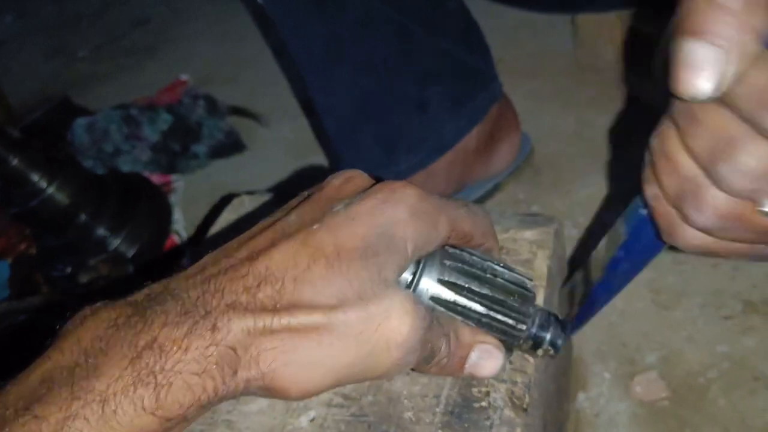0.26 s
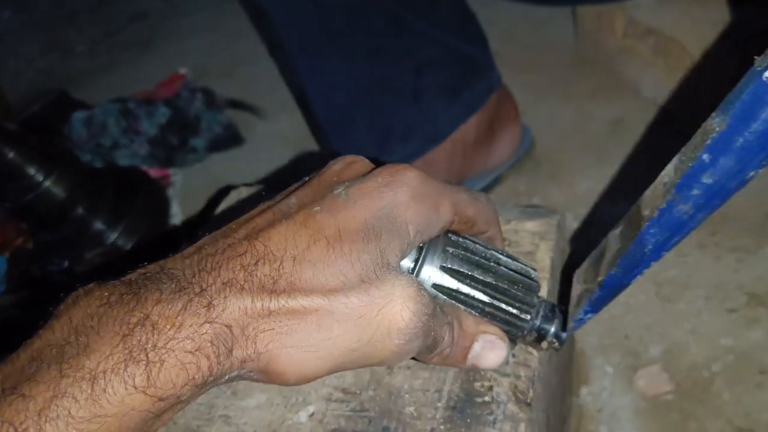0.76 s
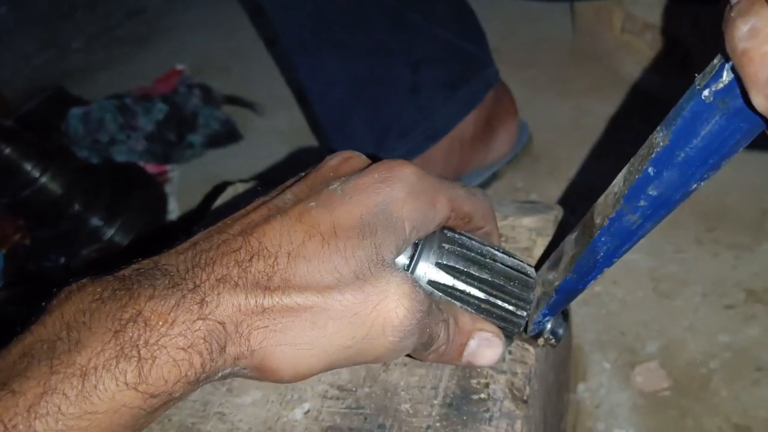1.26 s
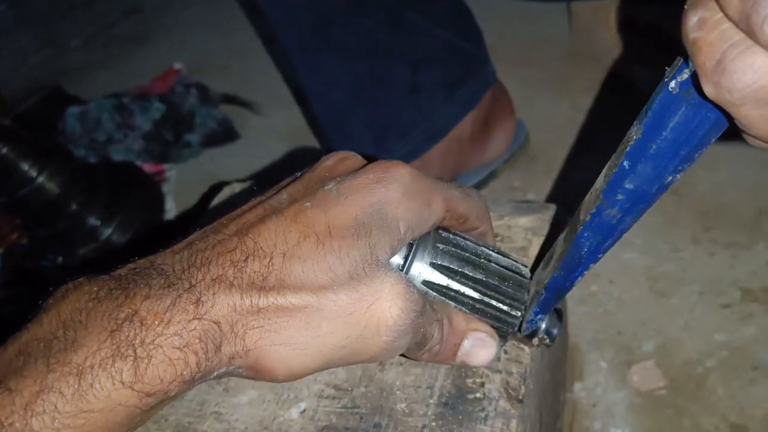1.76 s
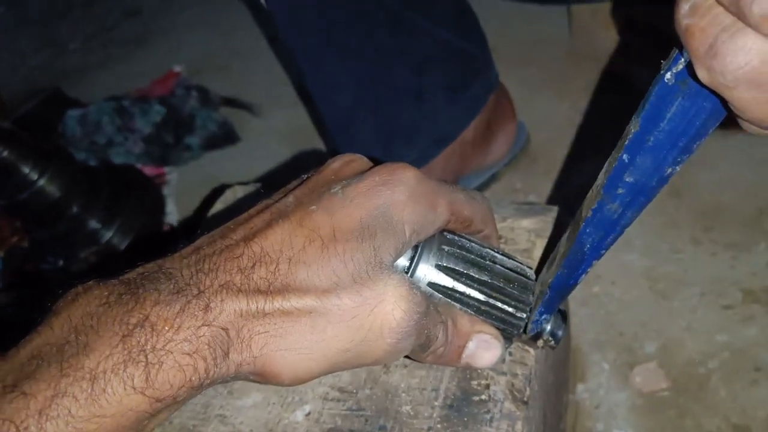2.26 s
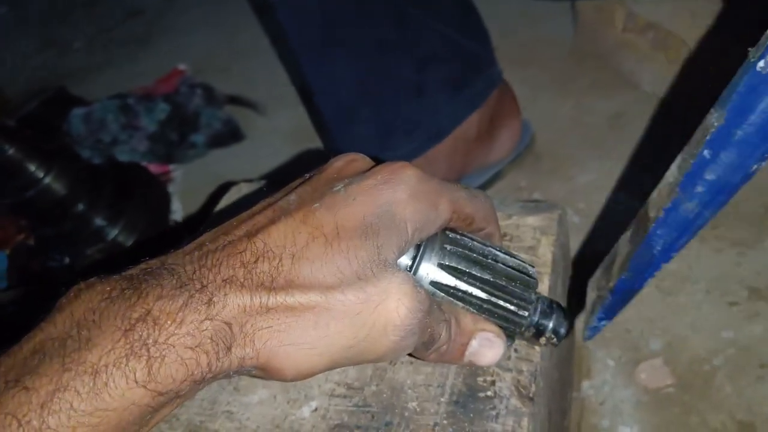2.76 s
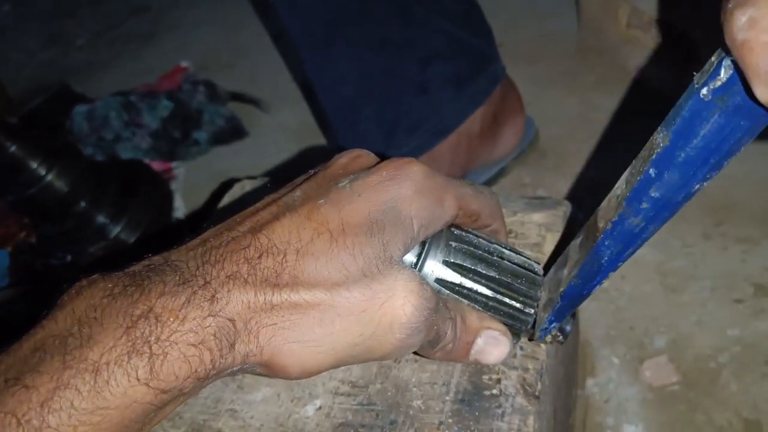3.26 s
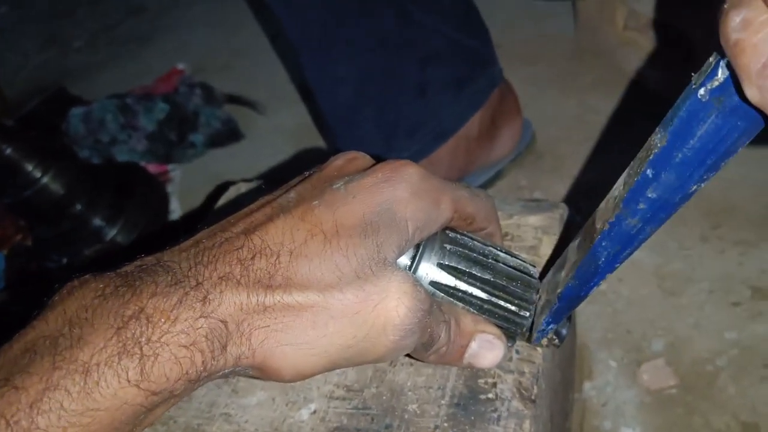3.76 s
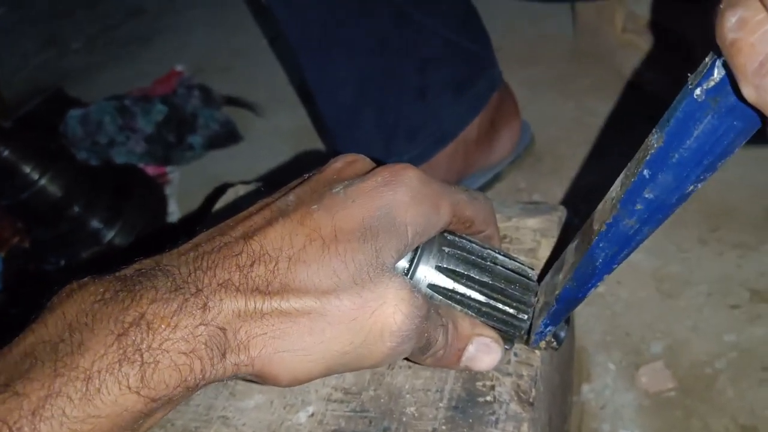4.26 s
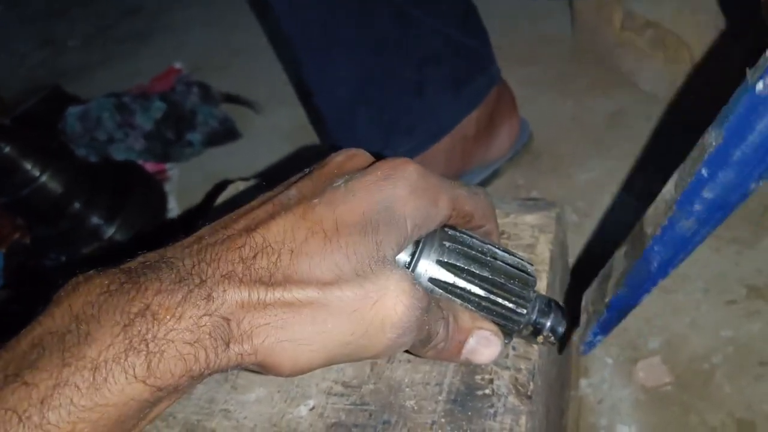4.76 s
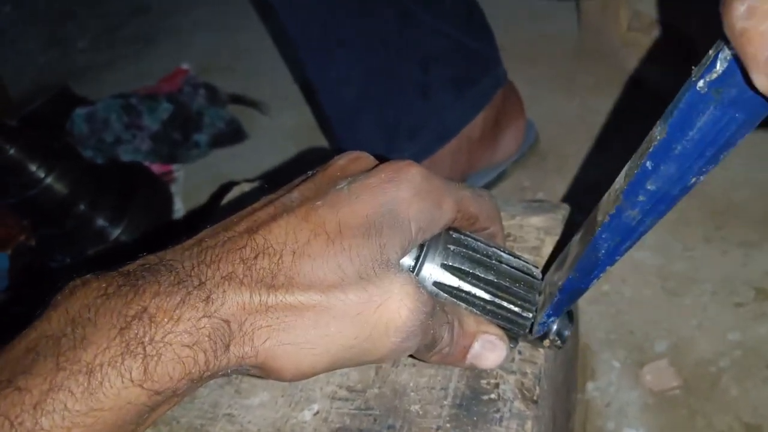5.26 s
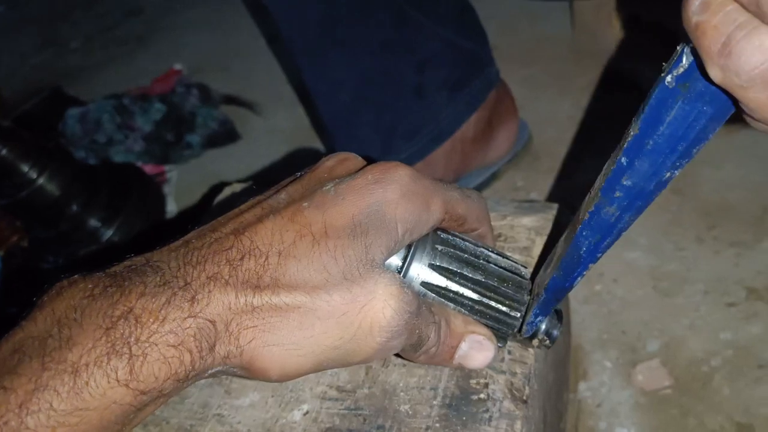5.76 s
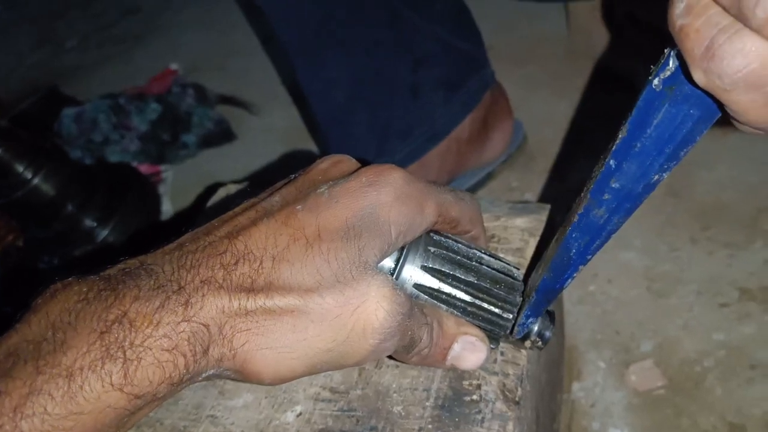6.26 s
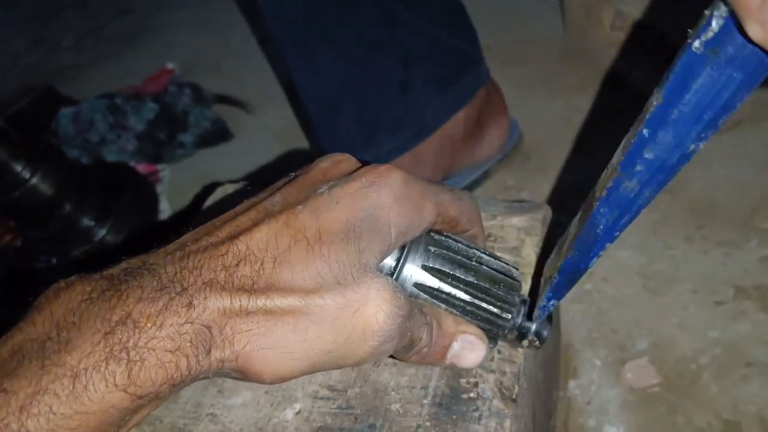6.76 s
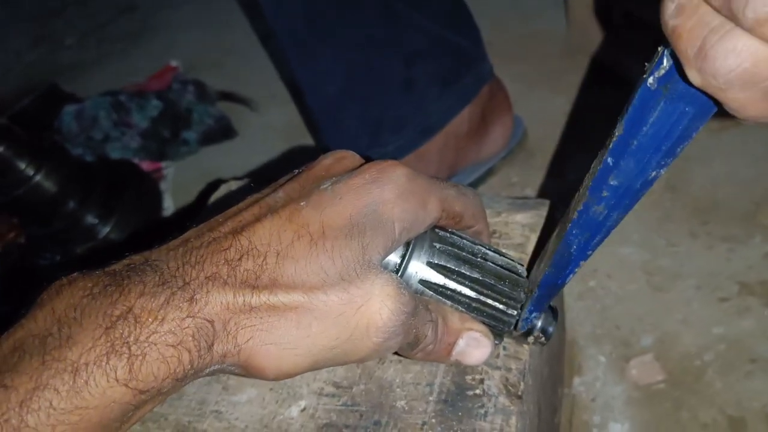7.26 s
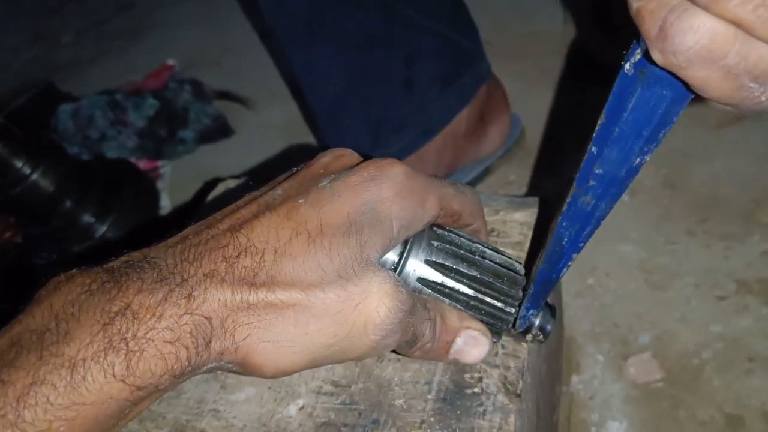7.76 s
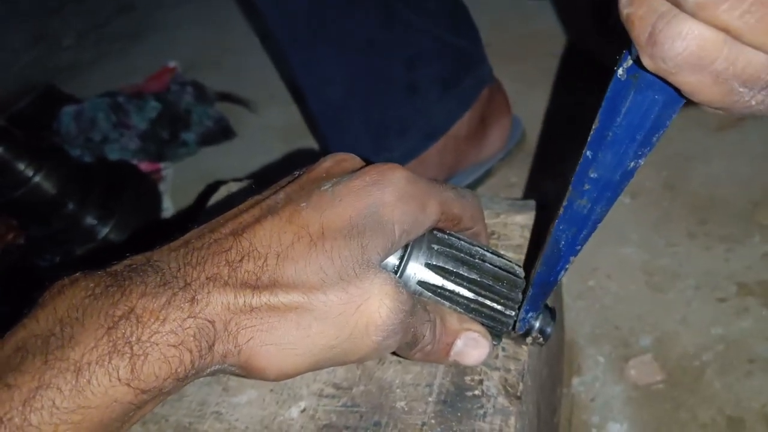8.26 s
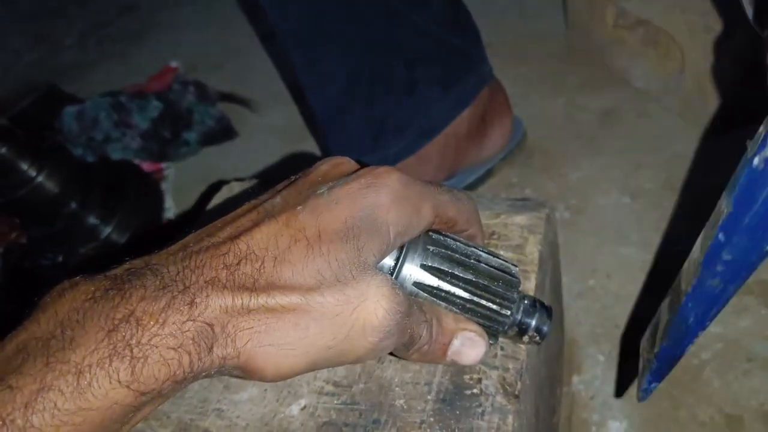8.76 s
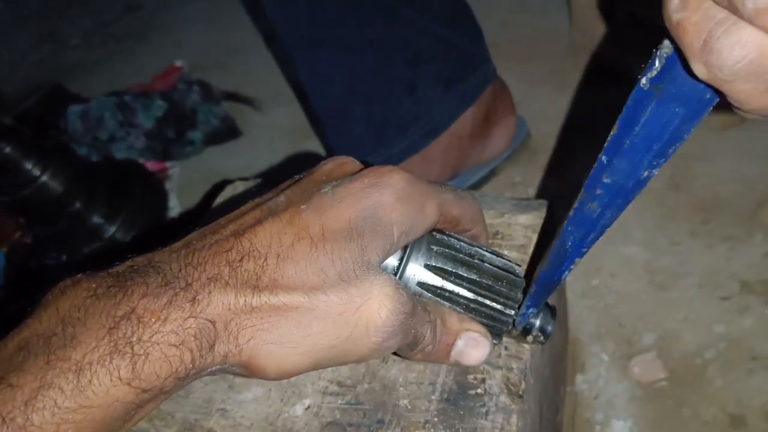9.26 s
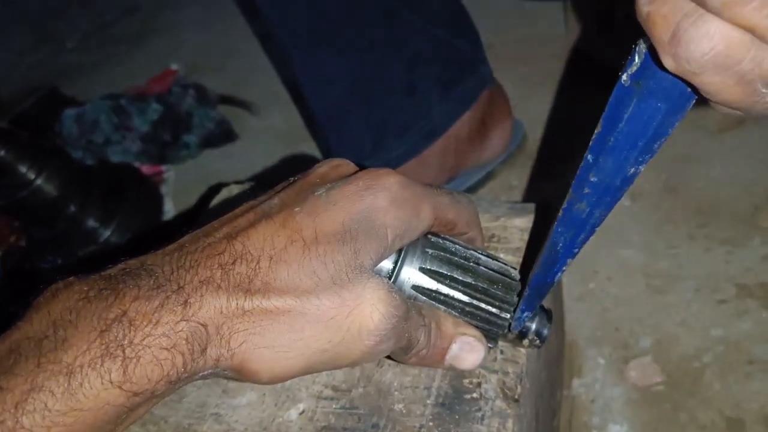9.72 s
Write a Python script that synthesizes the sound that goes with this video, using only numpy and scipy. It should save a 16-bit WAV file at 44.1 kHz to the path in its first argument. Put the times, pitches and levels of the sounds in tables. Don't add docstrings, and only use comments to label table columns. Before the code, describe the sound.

Close stereo pickup of metalwork: five loud, clattering, ringing chisel blows alternate with five sharp damped cracks, roughly a second apart. Small taps and soft knocks mark the tip touching and settling on the shaft before each damped hit. Bright hard walls answer every strike, a faint low boom returns late, and quiet traffic rumble, thin hiss and weak bird chirps sit behind.

```python
import sys
import numpy as np
from scipy import signal
from scipy.fft import rfft, irfft, next_fast_len
from scipy.io import wavfile
from scipy.ndimage import uniform_filter1d, map_coordinates

SR = 44100
rng = np.random.default_rng(int(sys.argv[2]) if len(sys.argv) > 2 else 0)


def magnitude_from_level(level_db):
    exponent = np.asarray(level_db, float) / 20
    return 10 ** exponent


def dump_mix(stems):
    frames = np.atleast_2d(stems).T
    limited = np.clip(frames, -1, 1)
    pcm = np.round(limited * 32767).astype(np.int16)
    wavfile.write(sys.argv[1], SR, pcm)


N = 440548
SPAN = next_fast_len(int(1.3 * SR))
T = np.arange(SPAN) / SR
HZ = np.fft.rfftfreq(SPAN, 1 / SR)


def unit(x):
    return x / np.sqrt(np.mean(x ** 2) + 1e-20)


def along(points, hz):
    f, v = np.transpose(points)
    return np.interp(np.log(hz + 1), np.log(f + 1), v)


def colour(x, gain):
    n = x.shape[-1]
    return irfft(rfft(x) * gain(np.fft.rfftfreq(n, 1 / SR)), n)


def causal(points):
    cepstrum = irfft(np.log(magnitude_from_level(along(points, HZ)) + 1e-6), SPAN)
    fold = np.where(np.arange(SPAN) < SPAN // 2, 2, 0) / np.r_[2, np.ones(SPAN - 1)]
    return np.exp(rfft(cepstrum * fold))


def diffuse(pair, most=1):
    # (frequency [Hz], left-right likeness [-1..1])
    likeness = [(60, 1), (180, 1), (550, 0.42), (1650, -0.12), (4970, 0.014), (15000, -0.3)]
    turn = lambda hz: np.arccos(np.clip(along(likeness, hz), -1, np.clip(most, 0, 1))) / 2
    mid, side = colour(pair, lambda hz: np.array([np.cos(turn(hz)), np.sin(turn(hz))]))
    return np.array([mid + side, mid - side])


def ring(families, family_db, scatter_db, rough=0):
    out = np.zeros((2, SPAN))
    for modes, lift_db in zip(families, family_db):
        for hz, db, t60 in modes:
            t = T[T < 1.3 * t60]
            phase = rng.uniform(0, 2 * np.pi, (2, 1))
            level_db = scatter_db * rng.standard_normal((2, 1))
            drift = map_coordinates(rng.standard_normal(140), [t * 90])
            swing = magnitude_from_level(db + lift_db - 60 * t / t60 + 0.77 * rough * drift)
            swing = swing * (1 - np.exp(-t / 0.0014))
            wave = np.sin(2 * np.pi * hz * t + phase + 1.5 * rough * drift)
            out[:, :len(t)] += magnitude_from_level(level_db) * swing * wave
    return out


def room_tail(reach):
    # (frequency [Hz], t60 [s])
    walls = [(50, 1.7), (190, 1.7), (400, 1.3), (800, 0.89), (1150, 0.7), (2500, 0.75), (6000, 0.72),
             (12000, 0.5)]
    # (frequency [Hz], level [dB])
    wall_tone = [(50, -11), (170, -2), (330, -5.5), (600, 1), (1100, -3), (2000, 1.5), (4500, -1.5),
                 (8000, -0.5), (12000, -5.5), (16000, -8.5)]
    hz, t, z = signal.stft(rng.standard_normal((2, SPAN)), SR, nperseg=256)
    patches = uniform_filter1d(rng.standard_normal(z.shape[1:]), size=2, axis=0)
    patches = uniform_filter1d(patches, size=14, axis=1)
    z = z * magnitude_from_level(2.5 * unit(patches))
    hz = hz[:, None]
    decay_db = along(wall_tone, hz) - 60 * t / (reach * along(walls, hz))
    decay_db = decay_db - 12.5 * (hz / (hz + 350)) * (t / (reach * 0.45)) ** 3
    tail = signal.istft(z * magnitude_from_level(decay_db), SR, nperseg=256)[1][:, :SPAN]
    tail = diffuse(tail, most=0.98) * np.clip((T - .015) / 0.0048, .05, 1)
    pan_db = -2.13
    return unit(tail) / np.sqrt(SPAN) * magnitude_from_level([[pan_db / 2], [-pan_db / 2]])


def add(out, s, sound, room_db, pan_db=0, reach=1, lead_db=-44):
    # (frequency [Hz], left minus right [dB])
    port_lean = [(200, -0.65), (1300, -2), (4000, -10.5), (9000, 5.5), (15000, 4.5)]
    # (frequency [Hz], level [dB])
    treble_bands = [(7400, 0), (8500, -9.5), (9200, 0.5), (9600, -6), (10000, 0.5), (10400, -4.5),
                    (11000, 5), (12000, -8), (12900, 0), (13300, -6.5), (14000, 3.5), (14700, -4.5),
                    (15400, 2), (16300, -11.5)]
    tail = room_tail(reach)
    smear = rng.standard_normal((2, SPAN)) * magnitude_from_level(lead_db - 60 * (T[-1] - T) / 0.048)
    lean = magnitude_from_level((along(port_lean, HZ) + pan_db) * [[.5], [-.5]])
    path = lean * (1 + rfft(smear)) + magnitude_from_level(room_db) * rfft(tail)
    heard = irfft(rfft(sound) * magnitude_from_level(along(treble_bands, HZ)) * path, SPAN)
    early = SR // 20
    at = out[:, round(s * SR) - early:][:, :SPAN]
    at += np.roll(heard, early, axis=1)[:, :at.shape[1]]


def air():
    # (frequency [Hz], density [dB per Hz])
    hum = [(12, -55.5), (20, -22), (69, -0.5), (132, -6.5), (276, -20.5), (346, -18.5), (421, -20.5),
           (559, -21), (741, -26), (1380, -21), (1730, -20.5), (1990, -19), (6150, -28.5), (15200, -55),
           (17000, -59)]
    # (time [s], level [dB])
    strength = [(0, -59), (1.5, -60), (4.3, -58.5), (6.199, -60), (8.302, -60.5), (9.99, -60)]
    # (time [s], length [s], level [dB])
    scuffs = [(2.096, 0.062, -65.5), (3.631, 0.078, -59), (4.303, 0.071, -66), (6.514, 0.037, -53.5)]
    t = np.arange(N) / SR
    s, db = np.transpose(strength)
    strength_db = np.interp(t, s, db)
    hiss_db = db.mean() - 5.5 + 1.3 * (strength_db - db.mean())

    z = signal.stft(rng.standard_normal((2, N)), nperseg=512)[2]
    patches = uniform_filter1d(uniform_filter1d(rng.standard_normal(z.shape[1:]), 6, 0), 12, 1)
    noise = diffuse(signal.istft(z * magnitude_from_level(1.3 * unit(patches)), nperseg=512)[1][:, :N])
    low = lambda hz: 1 / (1 + (hz / 500) ** 2)
    traffic = unit(colour(noise, lambda hz: magnitude_from_level(along(hum, hz)) * low(hz)))
    hiss = unit(colour(noise, lambda hz: magnitude_from_level(along(hum, hz)) * (1 - low(hz))))

    rub_tone = lambda hz: np.exp(-np.log((hz + 1) / 6500) ** 2 / .08)
    rub = unit(colour(rng.standard_normal((2, N)), rub_tone))
    rubbing = sum(magnitude_from_level(rub_db) * (t > at) * np.exp(-np.abs(t - at) / length) for at, length, rub_db in scuffs)
    preamp_hiss = magnitude_from_level(-77.5) * colour(rng.standard_normal((2, N)), lambda hz: hz < 15700)
    return magnitude_from_level(strength_db + 1.0) * traffic + magnitude_from_level(hiss_db) * hiss + rub * rubbing + preamp_hiss


def birds():
    # (time [s], length [s], start pitch [Hz], end pitch [Hz], level [dB])
    whistles = [(0, .12, 2116, 1980, -66), (0.839, 0.11, 2514, 2380, -64), (1.437, 0.276, 2216, 2350, -62),
                (2.937, 0.076, 2260, 1960, -73), (3.513, 0.082, 2180, 2480, -68.5),
                (3.587, .1, 2450, 1890, -65), (4.083, .08, 3260, 3230, -71), (4.194, .1, 2195, 1990, -68.5),
                (4.358, 0.12, 6200, 6660, -60), (4.405, 0.15, 5340, 5730, -69.5),
                (7.205, 0.059, 2310, 2200, -69), (9.203, 0.133, 2270, 2260, -67),
                (9.347, 0.14, 2510, 2333, -71)]
    # (highest pitch [Hz], octave level [dB])
    octave = [(2100, -2), (2350, -3.5), (2450, -18.5), (6000, -38.5)]
    t, out = np.arange(N) / SR, np.zeros((2, N))
    waver = 1 + .014 * map_coordinates(rng.standard_normal(700), [t * 60])
    for s, length, hz0, hz1, db in whistles:
        u = np.clip((t - s) / length, 0, 1)
        phase = 2 * np.pi * np.cumsum((hz0 + (hz1 - hz0) * u) * waver) / SR
        blur = magnitude_from_level(3.5 * unit(uniform_filter1d(rng.standard_normal((2, N)), 900)))
        whistle = np.sin(phase) + magnitude_from_level(along(octave, max(hz0, hz1))) * np.sin(2 * phase)
        out += magnitude_from_level(db) * blur * np.sin(np.pi * u) ** 0.27 * whistle
    return out


def skid_clatter(skid_s):
    # (frequency [Hz], density [dB per Hz])
    clatter_tone = [(18, -31.5), (30, -5.5), (151, -2), (634, -2.5), (804, -2), (1300, -7), (1880, -4.5),
                    (2800, -12), (3950, -9), (4510, -6), (7080, -13.5), (8530, -18), (15300, -15),
                    (17000, -52.5)]
    shape = (1 - np.exp(-T / 0.0023)) * (1 + 1.3 * np.exp(-T / 0.014))
    shape = shape / (1 + np.exp(np.clip((T - skid_s) / 0.0088, -40, 40)))
    contacts = diffuse(rng.standard_normal((2, SPAN)), most=0.34)
    contacts = contacts * magnitude_from_level(5 * unit(uniform_filter1d(rng.standard_normal(SPAN), 60)))
    return unit(irfft(rfft(unit(contacts)) * causal(clatter_tone), SPAN)) * shape


def floor_thump(skid_s):
    low = lambda hz: np.exp(-np.log((hz + 1) / 110) ** 2 / 0.42)
    thump = unit(colour(rng.standard_normal(SPAN), low)) * (1 - np.exp(-T / 0.0048))
    thump = thump * magnitude_from_level(-60 * np.maximum(T - skid_s, 0) / .12)
    return np.array([thump, thump])


def far_wall_boom():
    boom = np.sin(2 * np.pi * 55 * T) * np.exp(-((T - .53) / 0.17) ** 2)
    upper = np.sin(2 * np.pi * 178 * T) + np.sin(2 * np.pi * 211 * T)
    return boom + magnitude_from_level(-2.5) * upper * np.exp(-((T - .49) / .13) ** 2)


def heavy_blows(out):
    # (time [s], peak [dB], chisel ring [dB], shaft low ring [dB], shaft upper ring [dB])
    blows = [
        (0.271, -4.5, 2.5, 1, 2.5),
        (2.413, -2.5, -3.5, 2.5, -10),
        (4.54, -2.5, -5.5, -9, -8),
        (6.561, -1.5, -15.5, -6.5, -3),
        (8.554, -3, -4.5, -3, 5),
    ]
    # (frequency [Hz], level [dB], t60 [s])
    steel_modes = [
        [(1700, -14.5, 0.19), (3902, -1, 0.64), (3950, -5, 0.88), (7070, -13.5, 0.62), (7130, -14, .54)],
        [(1890, -7.5, .55), (6250, -16, 0.64)],
        [(4977, -8, 0.76), (5040, -7.5, 0.56), (9460, -25.5, 0.33)],
        [(10660, -24, 0.25), (11000, -16, 0.19), (13990, -25.5, .22), (15400, -26, .22)],
    ]
    skid_s = 0.064
    for s, db, *rings_db in blows:
        clatter = skid_clatter(skid_s)
        steel = ring(steel_modes, [*rings_db, 4.5], scatter_db=-0.5, rough=.85)
        steel = steel * (0.75 + 1.2 * np.exp(-T / 0.035)) * (1 - np.exp(-T / 0.0051))
        blow = magnitude_from_level(db - 13) * clatter + magnitude_from_level(db - 12.5) * steel
        add(out, s - .0015, blow, room_db=-8, pan_db=1, lead_db=-39)
        add(out, s - .009, magnitude_from_level(db - 24.5) * floor_thump(skid_s), room_db=-9)
        start = round(s * SR)
        out[:, start:][:, :SPAN] += magnitude_from_level(db - 44.0) * far_wall_boom()[:N - start]


def taps(out):
    # (time [s], peak [dB], low ring [dB], edge [dB], pan [dB])
    touches = [(0.3259, -3.5, -21, -27.5, -6), (1.0642, -24.5, -25, -25.5, -24.5),
               (1.1352, -32, -19, -30, -26), (3.0879, -16.5, -26, -28.5, -18),
               (3.1392, -31.5, -20.5, -47, -23), (5.2685, -18.5, -25.5, -17.5, -11),
               (5.3045, -34, -24, -19.5, -36), (5.3202, -37, -20, -30, -8), (7.289, -18, -22, -11.5, -25.5),
               (7.3433, -31.5, -17, -15.5, -31), (7.3588, -34.5, -27, -27, -10),
               (9.3314, -32, -9, -12.5, -14), (9.35, -46, -27, -20, -21)]
    # (time [s], peak [dB], pitch [Hz])
    grit_ticks = [(1.265, -51, 3950), (2.112, -57, 4000), (3.331, -42, 3950), (3.736, -54, 4200),
                  (7.593, -53.5, 4050), (7.664, -63, 3950), (9.47, -56, 4400), (9.85, -52, 4700)]
    # (frequency [Hz], level [dB], t60 [s])
    chisel_modes = [
        [(1696, 2.5, .22)],
        [(3915, 0.2, .05), (3925, -19, .3), (5020, -26, .066)],
        [(6270, -10, .13), (7080, 5, .075), (10800, -12, .08), (15400, -21, .05)],
    ]
    edge = causal([(150, -30), (370, -16.5), (800, -16.5), (1400, -1), (2800, 6), (4500, 7.5),
                   (6000, -0.5), (7000, -3.5), (8200, -21), (16000, -31.5)])
    for s, db, low_db, high_db, pan_db in touches:
        click = irfft(rfft(rng.standard_normal(SPAN) * magnitude_from_level(-60 * T / 0.0048)) * edge, SPAN)
        click_db = 11.5 + .4 * high_db
        chisel = ring(chisel_modes, [low_db, 0, high_db], scatter_db=1.44, rough=0.21)
        tap = magnitude_from_level(db) * (chisel + magnitude_from_level(click_db) * click)
        add(out, s - .001, tap, room_db=-11, pan_db=.5 * pan_db, reach=0.37, lead_db=-48.5)
    for s, db, hz in grit_ticks:
        tick = ring([[(hz, 0, .03), (7200, -6, .02)]], [4], scatter_db=1, rough=.3)
        add(out, s, magnitude_from_level(db) * tick, room_db=-10, reach=.3)


def pressed_hit(block_db, note, mid_db, high_db, crack_db):
    # (frequency [Hz], level [dB], t60 [s])
    pressed_modes = [
        [(2450, -11, 0.036)],
        [(1353, -2, 0.042), (1800, 0.4, 0.01), (3950, 1.5, .029), (7400, -15, 0.049)],
        [(4980, -9, .022)],
        [(6217, -9, .026), (9200, -4.5, 0.05), (10000, -6, 0.057), (10990, 1.86, 0.045), (13500, -3.7, .04),
         (15400, -7.5, .04)],
    ]
    crack = rng.standard_normal((2, SPAN)) * magnitude_from_level(crack_db - 60 * T / 0.024) * (1 - np.exp(-T / 0.00081))
    crack = .8 * crack[0] + .6 * crack
    tone = [(60, block_db - 30.5), (170, block_db + 6.5), (550, block_db + 12), (1100, mid_db + 10.5),
            (1850, mid_db + 12.5), (2800, 1), (4600, 2.5), (7500, -8), (10000, high_db),
            (12500, high_db + 7.0), (16000, high_db - 5)]
    block = np.sin(2 * np.pi * 205 * T) * magnitude_from_level(-60 * T / 0.042)
    block = block + 0.4 * np.sin(2 * np.pi * 450 * T) * magnitude_from_level(-60 * T / 0.015)
    families_db = [block_db + 4.0, mid_db, -3, high_db + 3]
    steel = magnitude_from_level(-10) * ring(pressed_modes, families_db, scatter_db=4.5, rough=0.6)
    lasting = ring([[note]], [0], scatter_db=4.06, rough=1.1)
    body = steel + lasting + magnitude_from_level(block_db + 4) * block
    small = causal([(30, -45), (80, -19), (140, -0.5), (16000, 2)])
    return irfft((rfft(crack) * causal(tone) + rfft(body)) * small, SPAN)


def damped_blows(out):
    # (time [s], peak [dB], block thud [dB], lasting note [Hz])
    blows = [(1.667, -7, -16.5, 1810), (3.7603, -5.5, -11.5, 1836), (5.7686, -3, -17.5, 1800),
             (7.8166, -4.5, -16, 1740), (9.917, -7, -8.5, 1747)]
    # (time [s], peak [dB], block thud [dB], lasting note [Hz], note level [dB])
    knocks = [
        (1.288, -24, -7, 1890, -5),
        (3.3491, -23, -4.5, 1387, 4),
        (5.4132, -48, 12.5, 642, 8.5),
        (7.3676, -50.5, 9.5, 900, 2),
    ]
    place = dict(reach=0.57, lead_db=-42.5)
    for s, db, block_db, hz in blows:
        hit = pressed_hit(block_db, (hz, -26, 0.39), mid_db=-3, high_db=-17.5, crack_db=-1.36)
        add(out, s - .001, magnitude_from_level(db) * hit, room_db=-7.5, **place)
    for s, db, block_db, hz, note_db in knocks:
        note_t60_s = 0.11 if hz > 1600 else 0.029
        hit = pressed_hit(block_db, (hz, note_db, note_t60_s), mid_db=3, high_db=-27, crack_db=-4.5)
        add(out, s - .001, magnitude_from_level(db) * hit, room_db=-18.5, **place)


def scene():
    air_pan_db = -2.94
    out = air() * magnitude_from_level([[air_pan_db / 2], [-air_pan_db / 2]]) + birds()
    heavy_blows(out)
    taps(out)
    damped_blows(out)
    return out


def band_limit(x):
    return signal.sosfilt(signal.butter(12, 17140, fs=SR, output="sos"), x)


def record(dry):
    x = dry / (1 + np.abs(dry / .9) ** 4) ** (1 / 4)
    x = colour(x, lambda hz: 1 / (1 + (hz / 16400) ** 40))
    return band_limit(x)


dry = scene()
out = record(dry)
dump_mix(out)
```